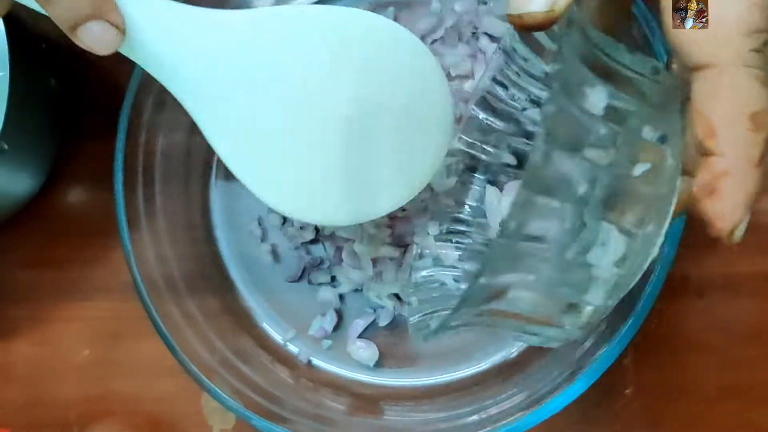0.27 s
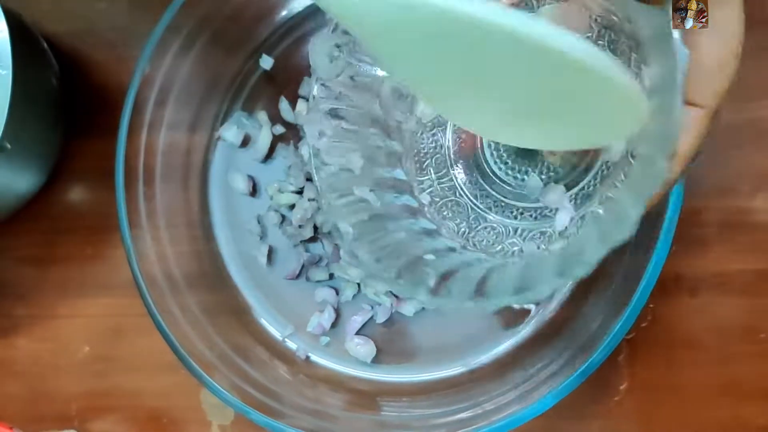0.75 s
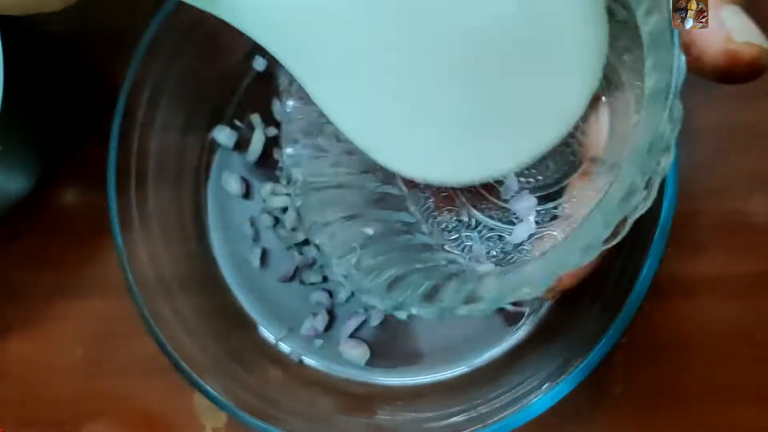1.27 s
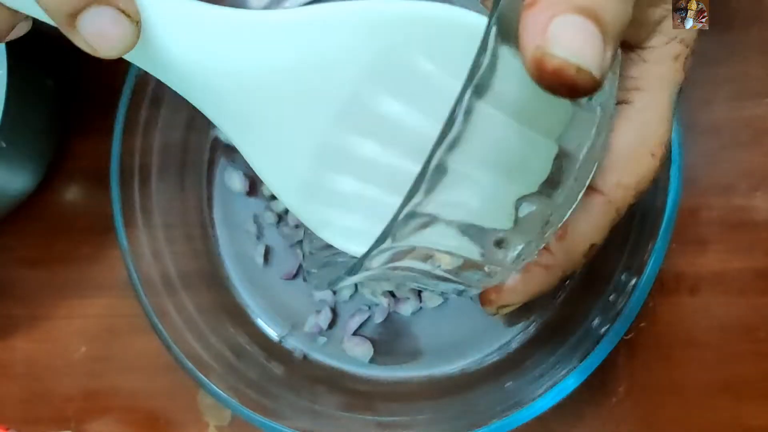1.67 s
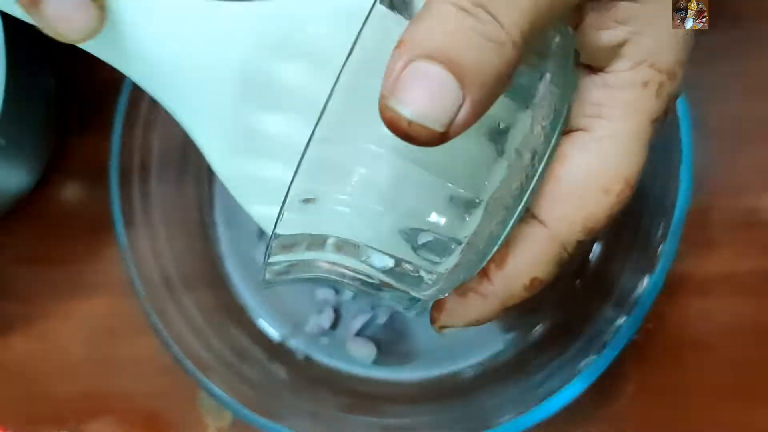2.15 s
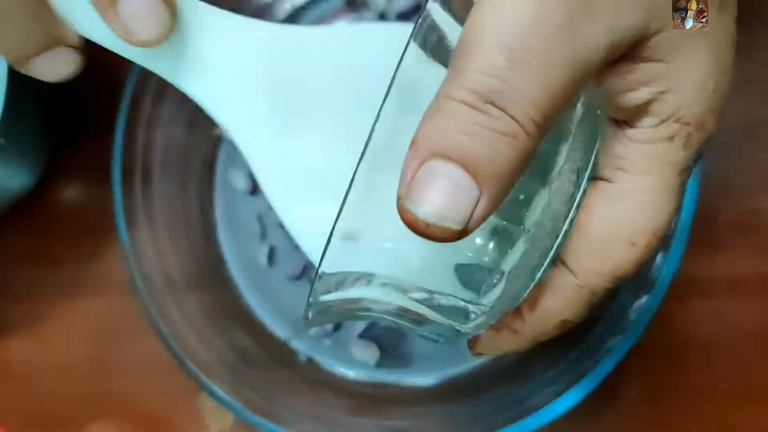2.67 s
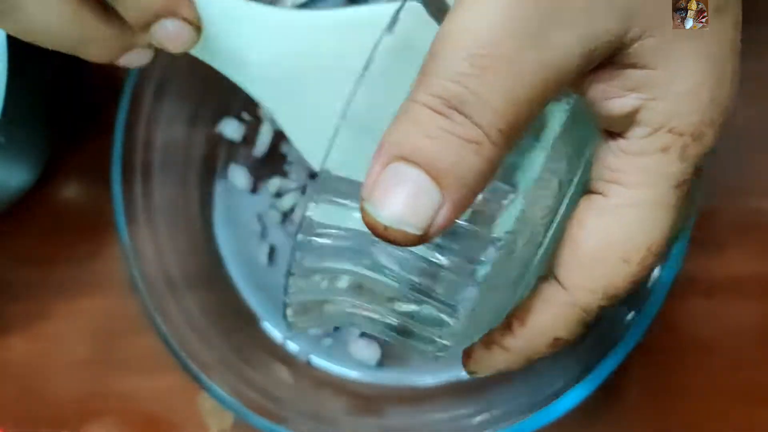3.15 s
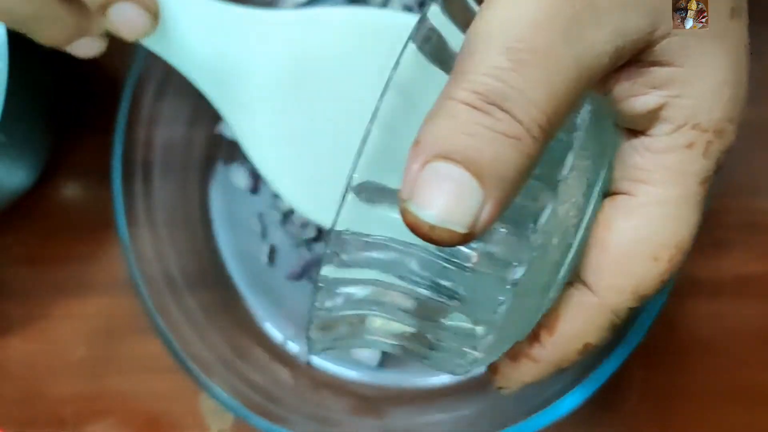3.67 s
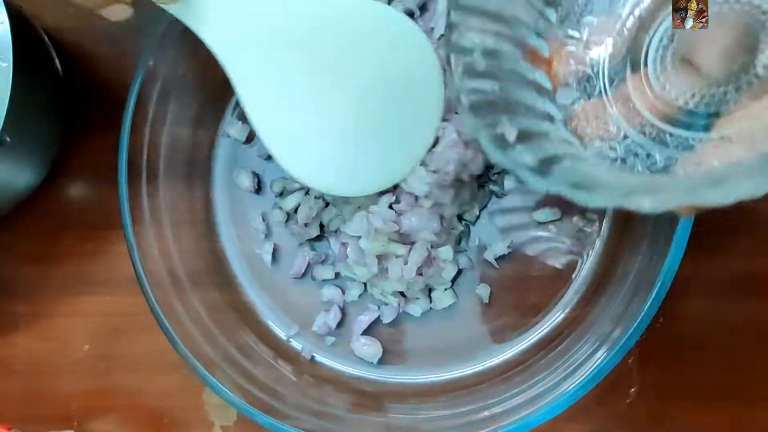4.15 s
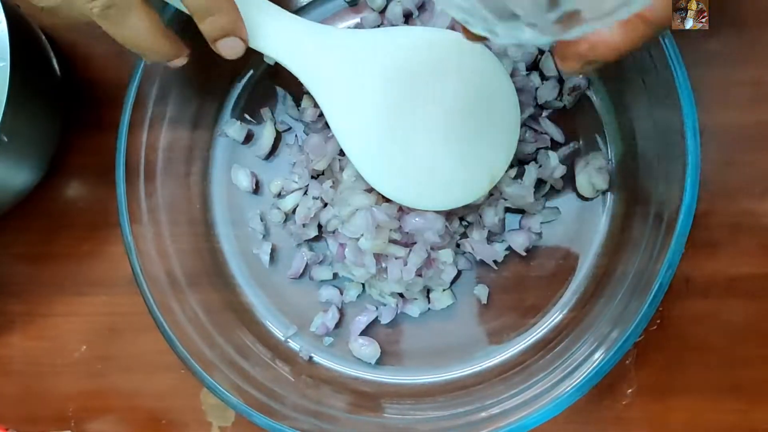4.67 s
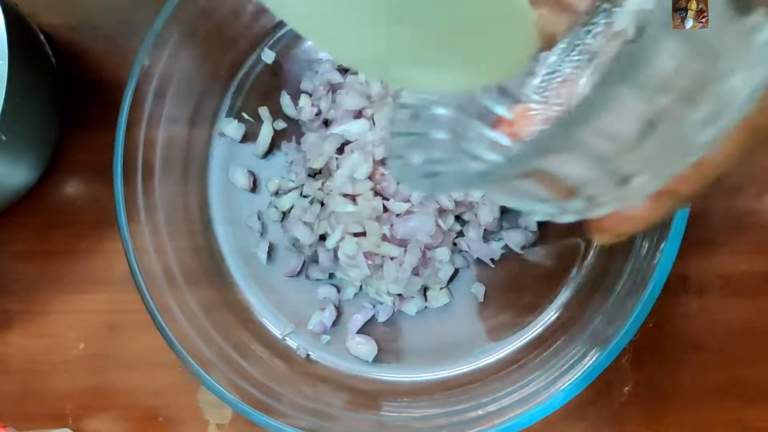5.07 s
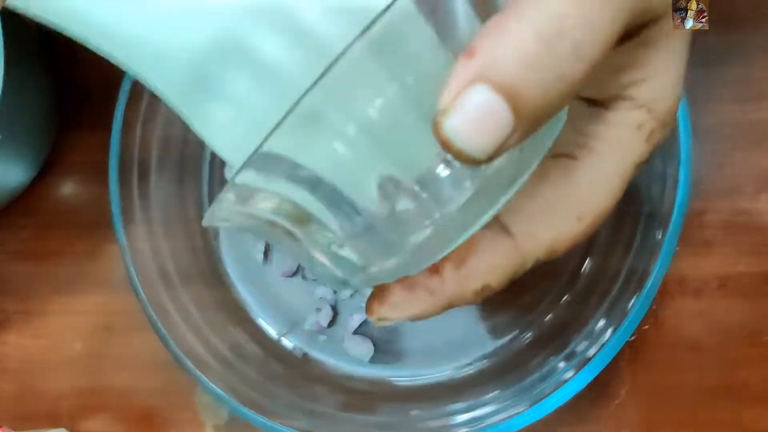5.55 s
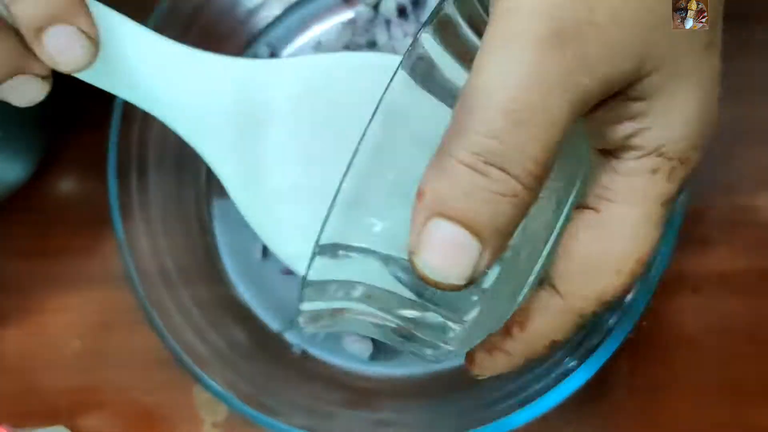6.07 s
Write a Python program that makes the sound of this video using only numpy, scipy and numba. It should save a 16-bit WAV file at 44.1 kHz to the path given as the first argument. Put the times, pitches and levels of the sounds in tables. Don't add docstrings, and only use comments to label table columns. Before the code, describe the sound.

Close up in a hard-walled kitchen, a plastic spatula works on a small glass bowl held in the fingers. Soft ticks lead to bright, quickly damped clinks, then a loud flat slap and gritty drag. Irregular taps and scrapes follow. Around four and a half seconds a larger glass bowl is touched and rings freely with a shimmer. More taps and blade chatter finish, over low hum and rumble.

```python
import sys
import numpy as np
from scipy import signal
from scipy.fft import rfft, irfft, next_fast_len
from scipy.io import wavfile
from scipy.ndimage import uniform_filter1d
from numba import njit

SR = 44100
rng = np.random.default_rng(int(sys.argv[2]) if len(sys.argv) > 2 else 0)


def int16_out(signal):
    q = np.round(np.clip(np.atleast_2d(signal).T, -1, 1) * 32767)
    wavfile.write(sys.argv[1], SR, q.astype(np.int16))


def volts_from_decibels(level):
    exponent = np.asarray(level, float) / 20
    return 10 ** exponent


N = 278252
PORT_LAG_S = 0.00027
# (frequency [Hz], level [dB], t60 [s], left minus right [dB])
HIGH_RING = [(4555, -1, .055, 20), (4600, -15, .09, 16), (4566, -32, .4, 20), (4522, -33, .36, 20),
             (4870, -24, .15, 18)]


def small_bowl():
    # (frequency [Hz], level [dB], t60 [s], left minus right [dB])
    knock = [(650, -16.5, 0.074, 4.3), (846, -6.5, 0.034, 7), (1050, 5.5, 0.023, 2.3),
             (1169, -0.5, 0.037, 2.98), (1312, 5.5, 0.013, 11), (1456, -20.5, .02, 3.4)]
    low_ring = [(1809.5, 2.5, 0.051, 12.1), (1830, -20, 0.16, 6.8)]
    top_ring = [(7994, -2, 0.028, 0.36), (10600, -32, 0.033, 0.73), (14760, -27, .04, 6)]
    # (frequency [Hz], level [dB], t60 [s], left minus right [dB])
    left_port = [(4915, -4.5, 0.011, 17.5)]
    scrape_db = [-6.5, -6, -13, -12, -6, 5, -17.5]
    # (frequency [Hz], level [dB])
    tick = [(300, -15), (650, -3.5), (1100, -6), (2300, -3), (3300, -3.5), (4700, -23.5), (9000, -28.5),
            (16000, -47)]
    # (frequency [Hz], level [dB])
    splinter = [(3000, -33.5), (6000, 2), (8000, -11), (11000, -4.5), (15000, -21), (16500, -22.5)]

    s, tick_db, knock_db, low_db, high_db, top_db = contacts()
    rub, bend = friction(), grip()
    bodies = [(knock_db, knock, 0.0006, 1.9, None),
              (low_db, low_ring, 0.00029, 2.1, bend),
              (high_db, HIGH_RING, 0.0005, 1.2, bend),
              (top_db, top_ring, 0.0003, 2.0, None),
              (tick_db, left_port, 0.000087, 2.0, None)]
    out = np.zeros((3, N))
    for (db, modes, swell_s, scatter_db, shift), rub_db in zip(bodies, scrape_db):
        push = blows(s, db, len(modes), scatter_db) + volts_from_decibels(rub_db) * rub
        out = out + ring(push, modes, swell_s, shift)
    tick_push = blows(s, tick_db + 10.5, 1, 0)[0] + volts_from_decibels(scrape_db[5]) * rub
    splinter_push = blows(s, top_db + 4.5, 1, 0)[0] + volts_from_decibels(scrape_db[6]) * rub
    return out + crack(tick_push, tick, 0.015, 7.5) + crack(splinter_push, splinter, 0.025, 0)


def contacts():
    # (time [s], tick [dB], low, high, top ring re tick [dB])
    rim_taps = [(0.6714, -29.5, -14.5, -9, -8.5), (0.6768, -30.5, -11, 3, -7), (1.266, -69, 2, 6, -20),
                (1.4548, -17, -17, -5.5, -10), (1.699, -31, -4, 4.5, -10), (1.7835, -30.5, -12.5, -37, -14),
                (2.1873, -32, -10, -11, -13.5), (2.2407, -31.5, -27, -7, -11),
                (2.6522, -34.5, -11, -1.5, -6.5), (2.661, -70, -5, 23, -13),
                (3.1677, -36.5, -6.5, -34, -11), (3.8504, -40.5, 6, -3, -14), (5.2754, -34.5, -6, -7.5, -9),
                (5.3118, -27, -4, -15, -2.5), (5.409, -47.5, -2, -21, -4), (5.724, -38, -10, -35, -7),
                (6.178, -30.5, -0.5, -15, -13.5)]
    # (time [s], tick [dB], low, high, top ring re tick [dB])
    wall_taps = [(0.387, -54, -17, -28.5, -28), (1.399, -41, -4, -28.5, -26),
                 (3.2368, -45.5, -26, -8.5, -32), (2.62, -33, -16, -5.5, -17),
                 (2.662, -36.5, -27, -14, -15), (2.697, -35.5, -16, -3.5, -18),
                 (2.4808, -39, -32.5, -33, -24), (2.894, -54, -16.5, -24, -7),
                 (2.9359, -44.5, -12.5, -13, -18), (3.1323, -35.5, -11.5, -10, -19),
                 (3.2988, -21.5, -14, -10, -24), (3.6839, -28.5, -4.5, -1.7, -14.5),
                 (3.8002, -35, -14.5, -17, -17), (3.8238, -43.5, -4, -24, -21),
                 (5.5248, -29, -7.5, -4.5, -15), (5.8305, -23, -19, -12.5, -18),
                 (5.838, -48, 5.5, 9.5, -25), (5.8448, -37.5, -17, -19, -30),
                 (5.9393, -39, -18, -18, -20.5)]
    # (time [s], knock [dB], low ring re knock [dB])
    flat_knocks = [(0.671, -28.5, -11), (0.8716, -56.5, -15), (0.9202, -55, -29), (1.2425, -50.5, -3),
                   (1.3990, -39, -17), (1.699, -46, -17), (1.7838, -33.5, -3.5), (2.462, -52, -27),
                   (2.482, -37.5, -33), (2.9346, -47.5, -21), (3.238, -42, -16), (3.2995, -39, -27.5),
                   (3.685, -41, -10), (3.8004, -39, -28), (3.8236, -49, -20), (3.8501, -53.5, 10),
                   (5.4433, -52, -3), (5.5262, -35, -30), (5.831, -34, -25), (5.8379, -33, -18),
                   (5.848, -45, -20), (5.9384, -58, -20), (6.178, -44.5, -33), (6.257, -46, -17),
                   (6.297, -41.5, -7)]
    knock_re_tick_db = -14.5
    tick_re_flat_db, high_re_flat_db, top_re_flat_db = -11, -14.5, -36.5
    rows = []
    for s, db, low, high, top in rim_taps + wall_taps:
        rows.append((s, db, db + knock_re_tick_db, db + low, db + high, db + top))
    for s, db, glass in flat_knocks:
        rows.append((s, db + tick_re_flat_db, db, db + glass, db + high_re_flat_db, db + top_re_flat_db))
    return np.transpose(rows)


def friction():
    # (time of most force [s], force [dB], rise [s], fall [s])
    scrapes = [(1.49, -63.5, .03, 0.16), (3.75, -62.5, .05, 0.06), (.938, -69, .03, 0.037),
               (0.001, -65.5, 0.012, 0.04), (0.951, -73, 0.17, 0.14), (1.385, -56, 0.087, 0.21),
               (1.919, -64, 0.076, 0.073), (2.902, -68.5, 0.05, 0.029), (3.849, -52, 0.025, 0.006),
               (5.412, -61, 0.066, 0.037), (5.86, -63, 0.06, 0.17)]
    end_db, grains_per_s = -13.5, 2500
    t = np.arange(N) / SR
    force = np.zeros(N)
    for s, db, rise_s, fall_s in scrapes:
        stroke_s, stroke_db = [s - rise_s, s, s + fall_s], [db + end_db, db, db + end_db]
        force += volts_from_decibels(np.interp(t, stroke_s, stroke_db, left=-200, right=-200))
    grains = (rng.random(N) < grains_per_s / SR) * volts_from_decibels(2.5 * rng.exponential(size=N) - 3)
    return force * volts_from_decibels(3.5 * walk(40)) * grains * rng.standard_normal(N)


def grip():
    # (start time [s], frequency [Hz])
    grips = [(0, 4575), (1.44, 4550), (1.475, 4585), (1.69, 4533), (2.18, 4560), (2.64, 4550), (2.69, 4568),
             (3.28, 4544), (3.67, 4570), (3.84, 4550), (5.26, 4520), (5.3, 4533), (5.51, 4556),
             (5.82, 4544), (6.17, 4560)]
    wobble_share, wobble_per_s = 0.006, 60
    s, hz = np.transpose(grips)
    held_hz = hz[np.searchsorted(s, np.arange(N) / SR, side="right") - 1]
    return held_hz / HIGH_RING[0][0] - 1 + wobble_share * walk(wobble_per_s)


def slap():
    # (time [s], level [dB])
    slaps = [
        (1.2985, -14.5),
        (6.3086, -30),
    ]
    # (frequency [Hz], level [dB], t60 [s], left minus right [dB])
    slap_modes = [(764, -8, 0.019, -4), (1003, -0.5, 0.021, -7.5), (1399, 13.5, 0.0083, 5.5),
                  (1560, -8, 0.011, 2.5), (1930, 6, 0.0083, 9.5), (2130, 1.5, 0.0045, -2.5),
                  (2270, 4, 0.014, 14.5), (2800, -8.5, 0.0024, 17), (3400, -20.5, 0.0092, 3),
                  (4753, -12, 0.018, 28.5), (1767, 11.5, 0.0056, 7.5)]
    return struck(slaps, slap_modes, 0.27, 0.00053)


def drag():
    # (time [s], force [dB])
    drag_force = [
        (1.309, -65),
        (1.33, -61.5),
        (1.39, -57),
        (1.428, -50.5),
        (1.447, -64),
        (1.52, -71.5),
    ]
    # (frequency [Hz], level [dB], t60 [s], left minus right [dB])
    drag_modes = [(1036, 0, .035, -5), (1285, -0.5, .024, -0.5), (1530, -3.5, 0.017, 1),
                  (1830, 1.5, .028, 0), (2300, -6, .028, 2), (4660, -22, .015, 15.5)]
    force_db = np.interp(np.arange(N) / SR, *np.transpose(drag_force), left=-200, right=-200)
    force = volts_from_decibels(force_db + 3 * walk(90))
    grains_per_s = 3000
    grains = (rng.random(N) < grains_per_s / SR) * volts_from_decibels(2.3 * rng.exponential(size=N)) * rng.standard_normal(N)
    return ring(np.tile(force * grains, (len(drag_modes), 1)), drag_modes, 0.0004)


def chatter():
    # (time [s], level [dB])
    chatter_hits = [(2.4625, -39), (2.481, -40), (3.2372, -35), (3.2995, -45), (3.8006, -37), (3.825, -50),
                    (3.849, -46), (5.8302, -22.5), (5.8385, -32), (5.847, -39), (5.859, -36), (5.869, -46),
                    (5.898, -53), (5.906, -53), (5.925, -46), (5.9385, -41), (5.968, -63)]
    # (frequency [Hz], level [dB], t60 [s], left minus right [dB])
    blade = [(1145, 3, .035, 7), (1275, -1, .028, 3)]
    return struck(chatter_hits, blade, 0.5, 0.00026)


def edge_hits():
    # (time [s], level [dB])
    edge_taps = [(0.6769, -36.5), (1.4546, -27), (1.7843, -44), (2.1874, -54), (2.2398, -31),
                 (2.6968, -32.5), (3.1657, -46.5), (3.2985, -50), (5.3118, -30), (5.7234, -40),
                 (6.1769, -39)]
    # (frequency [Hz], level [dB], t60 [s], left minus right [dB])
    edge = [(2277, -1, 0.017, 8)]
    return struck(edge_taps, edge, 0, 0.00065)


def brushes():
    # (time [s], level [dB])
    strokes = [
        (.929, -38),
        (.9485, -41.5),
        (.965, -51.5),
    ]
    # (frequency [Hz], level [dB], t60 [s], left minus right [dB])
    brush_modes = [(4575, 0, .028, 16), (7960, -15, .05, 0)]
    return struck(strokes, brush_modes, 0, 0.007)


def large_bowl():
    # (time [s], level [dB])
    bowl_hit = [
        (4.5055, -39),
    ]
    # (frequency [Hz], level [dB], t60 [s], left minus right [dB])
    bowl_modes = [(748, -13, .55, -2), (739, -16, .45, 0), (1686, 2.5, .52, 2), (1702.5, 7.5, .31, 3),
                  (2706, 2.5, .5, -4), (2696, -9, .5, 6), (3848, -11.5, .52, 5), (3836, -21, .6, 2),
                  (5131, -8.5, .48, 0), (5120, -19, .5, -4), (6592, -21, .35, -8), (8225, -27, .25, 2),
                  (10050, -33, .13, 0), (11500, -38, .08, 0)]
    return struck(bowl_hit, bowl_modes, 0, 0.00054)


def bowl_rim():
    # (time [s], level [dB])
    rim_hits = [
        (4.5055, -25.5),
        (4.5275, -38),
        (4.539, -40.5),
    ]
    # (frequency [Hz], level [dB], t60 [s], left minus right [dB])
    rim_modes = [(1230, -15, 0.011, 25), (1840, 11, 0.0028, 0), (3100, -17, 0.0048, -5),
                 (4970, -6, 0.0087, 13)]
    return struck(rim_hits, rim_modes, 0.3, 0.0001)


def hard_cracks():
    # (time [s], level [dB])
    cracks = [
        (1.3002, -14),
        (4.5076, -18),
        (4.53, -23.5),
    ]
    # (frequency [Hz], level [dB])
    dull_crack = [(300, -20.5), (700, -4.5), (2300, -0.5), (3300, -6.5), (5000, -17.5), (7000, -18.5),
                  (10000, -41.5), (16000, -49)]
    s, db = np.transpose(cracks)
    return crack(blows(s, db, 1, 0.5)[0], dull_crack, 0.025, 0.94)


def table_thuds():
    # (time [s], level [dB])
    thuds = [
        (0.67, -49),
        (1.454, -26),
        (1.698, -33.5),
        (1.783, -53.5),
        (2.646, -45),
        (3.297, -39.5),
        (3.843, -45),
        (4.506, -41.5),
        (5.825, -64),
    ]
    # (frequency [Hz], level [dB], t60 [s], left minus right [dB])
    table = [(114, -13, 0.057, 2), (166.8, -14.5, 0.11, 2.4), (245.3, -11, 0.049, 2.2),
             (342.4, -6, 0.054, 1.05), (474.7, 2, 0.0078, 3.2)]
    return struck(thuds, table, 2.03, 0.00058)


def soft_ticks():
    # (time [s], level [dB], frequency [Hz], t60 [s])
    ticks = [
        (0.017, -38, 1320, 0.034),
        (0.017, -53, 1846, 0.032),
        (0.2006, -54, 1260, 0.04),
        (4.012, -54.5, 2740, 0.023),
        (4.256, -55, 1690, 0.045),
        (4.257, -59.5, 3100, 0.025),
        (4.383, -57, 1590, 0.032),
        (4.384, -55, 2800, 0.021),
        (4.431, -70.5, 2800, 0.18),
    ]
    return sum(struck([(s, db)], [(hz, 0, t60, 3)], 0, 0.00049) for s, db, hz, t60 in ticks)


def kitchen(sent):
    # (frequency [Hz], t60 [s], level [dB])
    echo = [(257, 0.81, -20), (582.3, 0.58, -16.5), (1240, 0.58, -21.5), (2160, 0.61, -21.5),
            (5650, 0.5, -18), (9610, 1, -44), (14200, 0.69, -25.5)]
    t = np.arange(SR) / SR
    tail = 0
    for hz, t60, db in echo:
        octave = signal.butter(2, [hz / 2 ** .5, hz * 2 ** .5], "band", fs=SR, output="sos")
        band = signal.sosfilt(octave, rng.standard_normal((2, SR)))
        tail = tail + volts_from_decibels(db - 60 * t / t60) * band / 10
    tail = tail * np.clip((t - 0.006) / 0.00047, 0, 1)
    return signal.fftconvolve(sent[None], tail, axes=1)[:, :N]


def air():
    # (frequency [Hz], likeness [0-1])
    likeness = [(60, 1), (130, 0.8), (290, 0.7), (640, 1), (1410, 0), (3100, 0.6), (6820, 0.01),
                (15000, 0.31)]
    # (frequency [Hz], level [dB per Hz])
    low_air = [(20, -90), (60, -75), (85, -89), (120, -77), (190, -81.5), (310, -80.5), (370, -87.5),
               (700, -89), (2000, -100), (3000, -105), (4200, -113), (5000, -140)]
    # (frequency [Hz], level [dB per Hz])
    hiss = [(2500, -140), (4000, -111), (4800, -106), (5600, -115), (6700, -115), (7300, -106),
            (8600, -108), (9200, -114), (15600, -116), (16200, -150)]
    # (frequency [Hz], level [dB], unsteadiness [1/s])
    hum = [(101, -62, 5.2), (149.2, -62.5, 15), (193.6, -73.5, 7.6), (313, -83.5, 11)]
    hz, like = np.transpose(likeness)
    like = np.clip(like, 0, 0.9)
    mid, side = (colour(rng.standard_normal(N), np.transpose([hz, 10 * np.log10(power)]))
                 for power in (1 + like, 1 - like))
    out = colour(np.array([mid + side, mid - side]), low_air) * volts_from_decibels(29.0 + 0.57 * walk(1.7))
    out = out + colour(rng.standard_normal((2, N)), hiss) * volts_from_decibels(35)
    t = np.arange(N) / SR
    for hz, db, rate in hum:
        out = out + volts_from_decibels(db + 0.95 * walk(rate)) * np.sin(2 * np.pi * hz * t + 1.4 * walk(rate))
    rumble = volts_from_decibels(rumble_db(t) + 5.5 + 2.4 * walk(3.3))
    return out + rumble * np.sin(2 * np.pi * 47 * t + 5.7 * walk(32))


def rumble_db(t):
    # (time [s], level [dB])
    swells = [
        (0.01, -88),
        (0.84, -70),
        (1.3, -71),
        (1.58, -63),
        (1.809, -64),
        (2.532, -67.5),
        (3.809, -64),
        (4.78, -67),
        (5.46, -63.5),
        (5.9, -65.5),
    ]
    rest_db, fade_db_per_s = -77.5, 43.5
    return np.maximum(rest_db, np.max([db - fade_db_per_s * np.abs(t - s) for s, db in swells], axis=0))


def at_ports(diffuse):
    # (frequency [Hz], left minus right [dB])
    ports = [(60, 6.5), (110, 2.5), (200, 2.5), (380, 1), (700, -3), (1290, 2.5), (2380, 2), (4700, 9.5),
             (8120, -4), (15000, 7.5)]
    hz, db = np.transpose(ports)
    return np.array([colour(diffuse[0], np.transpose([hz, db / 2])),
                     colour(diffuse[1], np.transpose([hz, -db / 2]))])


def struck(hits, modes, scatter_db, swell_s):
    s, db = np.transpose(hits)
    return ring(blows(s, db, len(modes), scatter_db), modes, swell_s)


def blows(times_s, db, count, scatter_db):
    push = np.zeros((N, count))
    size = volts_from_decibels(np.asarray(db)[:, None] + scatter_db * rng.standard_normal((len(times_s), count)))
    np.add.at(push, np.minimum(np.asarray(times_s) * SR, N - 1).astype(int), size)
    return np.ascontiguousarray(push.T)


def ring(push, modes, swell_s, bend=None):
    # (frequency [Hz], phase [rad])
    port_turn = [(250, .3), (600, 1.2), (1100, 2.1), (2000, 1.4), (8000, 1.6)]
    hz, db, t60, pan_db = np.transpose(modes)
    turn = np.exp(1j * (2 * np.pi * hz * PORT_LAG_S - np.interp(hz, *np.transpose(port_turn))))
    sign = (-1) ** np.arange(len(hz))
    gain = np.transpose(sign * np.array([volts_from_decibels(db + pan_db / 2), volts_from_decibels(db - pan_db / 2) * turn, volts_from_decibels(db)]))
    swell = np.exp((2j * np.pi * hz - 1 / swell_s) / SR)
    pole = np.exp((2j * np.pi * hz - np.log(1000) / t60) / SR)
    bend = np.zeros(N) if bend is None else bend
    out = resonate(push, swell, pole, gain, int(PORT_LAG_S * SR), bend)
    highpass = signal.butter(2, 0.063 * hz.min(), "high", fs=SR, output="sos")
    return signal.sosfilt(highpass, out[:, :N])


@njit
def resonate(push, swell, pole, gain, lag, bend):
    out = np.zeros((3, len(push[0]) + lag))
    for m in range(len(pole)):
        w, z, share, step = 0j, 0j, 1 - abs(swell[m]), np.angle(pole[m])
        for i in range(len(push[0])):
            w = w * swell[m] + push[m, i] + 1e-18
            z = z * pole[m] * (1 + 1j * step * bend[i]) + w * share
            out[0, i] += (z * gain[m, 0]).imag
            out[1, i + lag] += (z * gain[m, 1]).imag
            out[2, i] += (z * gain[m, 2]).imag
    return out


def crack(push, spectrum, t60, pan_db):
    decay = np.exp(-np.log(1000) / t60 / SR)
    burst = signal.lfilter([1], [1, -decay], np.abs(push)) * rng.standard_normal(N)
    burst = colour(burst, spectrum)
    right = np.roll(burst, int(PORT_LAG_S * SR))
    return np.array([volts_from_decibels(pan_db / 2) * burst, volts_from_decibels(-pan_db / 2) * right, burst])


def colour(x, points):
    hz, db = np.transpose(points)
    size = next_fast_len(N)
    bins_hz = np.maximum(np.fft.rfftfreq(size, 1 / SR), 1)
    gain = volts_from_decibels(np.interp(np.log(bins_hz), np.log(hz), db))
    return irfft(rfft(x, size) * gain, size)[..., :N]


def walk(rate):
    k = int(SR / rate)
    steps = np.repeat(rng.standard_normal(N // k + 1), k)
    return uniform_filter1d(uniform_filter1d(steps, k), k)[:N]


def starve(x):
    # (start [s], end [s], patches lost [0-1])
    starved = [
        (.31, .54, .5),
        (1.06, 1.24, .95),
    ]
    # (frequency [Hz], risk of loss [0-1])
    starve_risk = [(2600, 0), (3800, 1), (4400, .3), (4900, .3), (5400, 1), (6800, 1), (7300, .15),
                   (8700, .15), (9200, 1)]
    # (start [s], end [s])
    hushes = [
        (.645, .657),
        (1.438, 1.447),
        (2.228, 2.236),
        (2.598, 2.61),
        (3.155, 3.162),
        (3.228, 3.234),
        (3.668, 3.677),
        (5.266, 5.272),
        (5.711, 5.719),
    ]
    starve_fade_s, hush_fade_s = 0.03, 0.002
    hz, s, z = signal.stft(x, SR, nperseg=2048)
    share = sum(p * np.clip(np.minimum(s - a, b - s) / starve_fade_s + .5, 0, 1) for a, b, p in starved)
    patch = np.kron(rng.random((33, len(s) // 2 + 1)), np.ones((32, 2)))[:len(hz), :len(s)]
    lost = patch < share * np.interp(hz, *np.transpose(starve_risk))[:, None]
    x = signal.istft(z * np.where(lost, volts_from_decibels(-22), 1), SR, nperseg=2048)[1][:, :N]
    t = np.arange(N) / SR
    hush = sum(np.clip(np.minimum(t - a, b - t) / hush_fade_s + .5, 0, 1) for a, b in hushes)
    return x - 0.95 * hush * colour(x, [(1200, -50), (2300, 0)])


def scene():
    near = small_bowl() + slap() + drag() + chatter() + edge_hits() + brushes()
    near = near + bowl_rim() + hard_cracks() + table_thuds() + soft_ticks()
    bowl = large_bowl()
    sent = near[2] + volts_from_decibels(-9) * bowl[2]
    return near[:2] + bowl[:2] + at_ports(kitchen(sent) + air())


def low_pass(x):
    return signal.sosfilt(signal.butter(12, 16510, fs=SR, output="sos"), x)


def record(dry):
    limit = 1.15
    rounded = limit * np.tanh(dry / limit)
    mix = colour(starve(rounded), [(15950, 0.0), (16450, -60.5)])
    return low_pass(mix)


dry = scene()
out = record(dry)
int16_out(out)
```